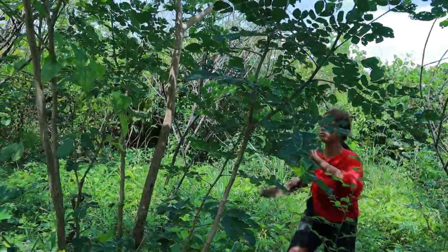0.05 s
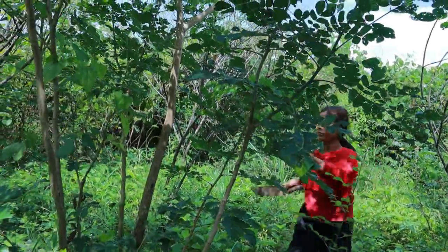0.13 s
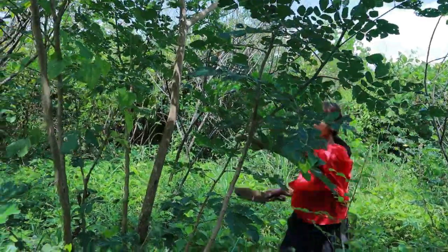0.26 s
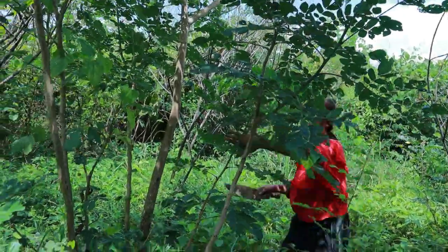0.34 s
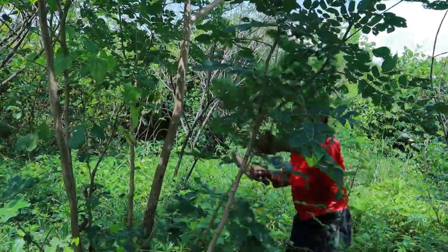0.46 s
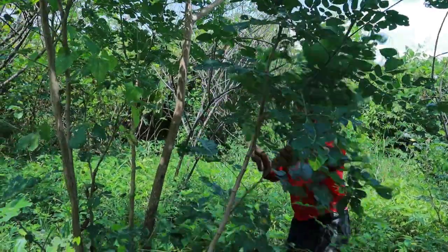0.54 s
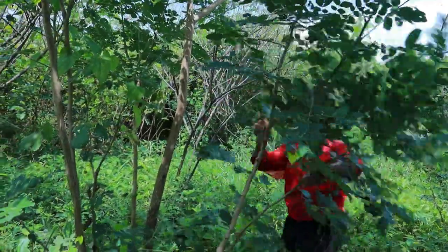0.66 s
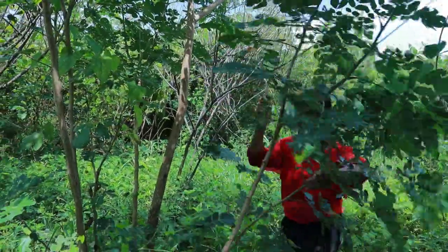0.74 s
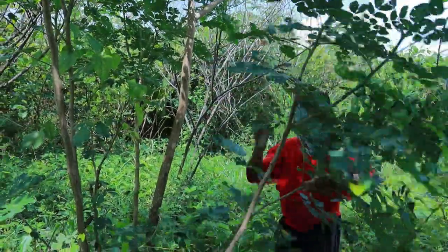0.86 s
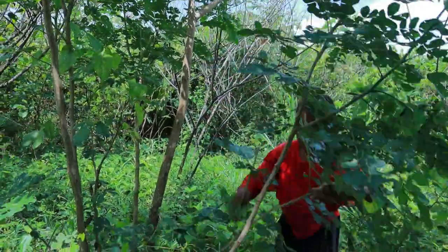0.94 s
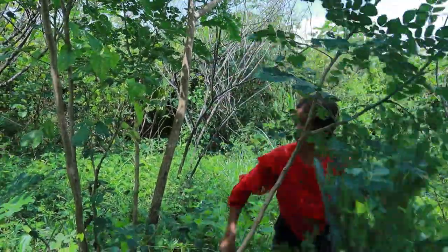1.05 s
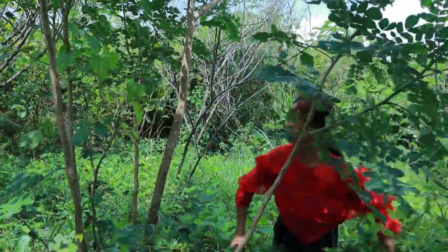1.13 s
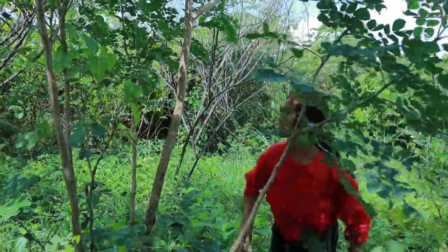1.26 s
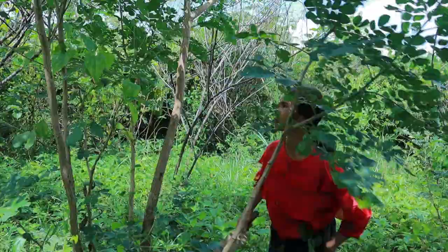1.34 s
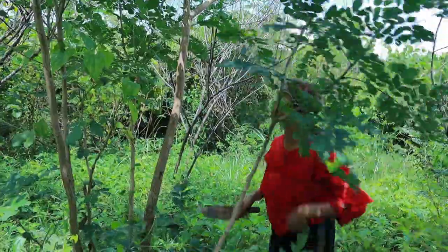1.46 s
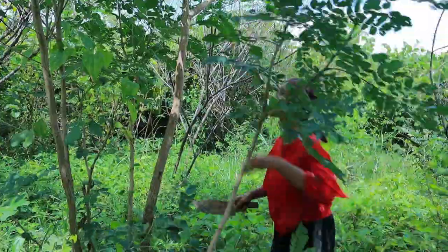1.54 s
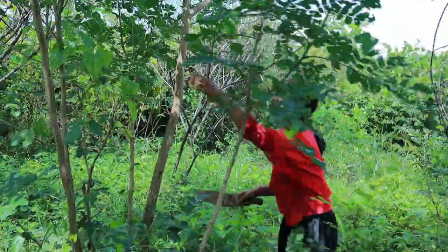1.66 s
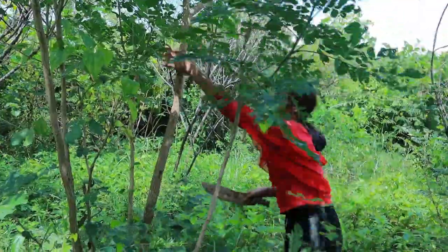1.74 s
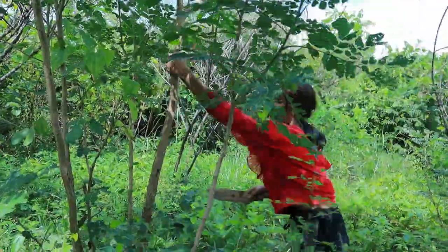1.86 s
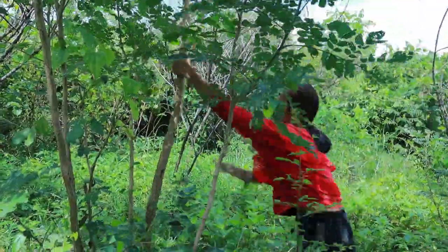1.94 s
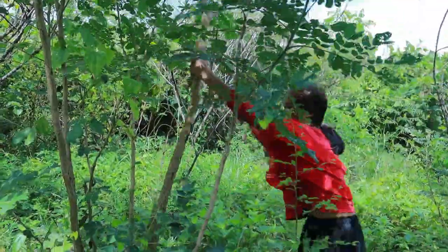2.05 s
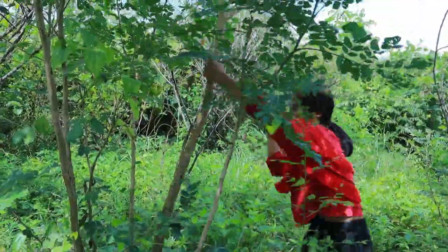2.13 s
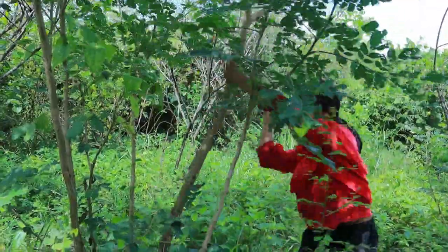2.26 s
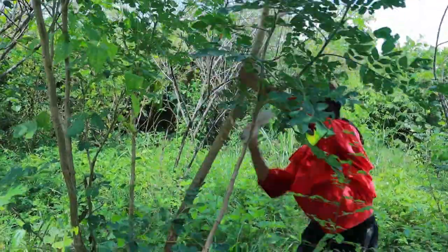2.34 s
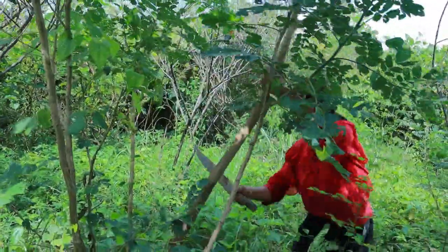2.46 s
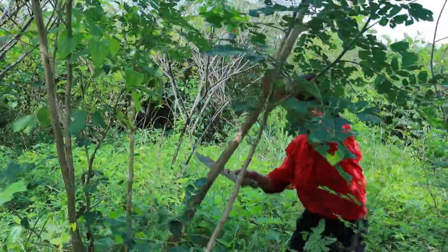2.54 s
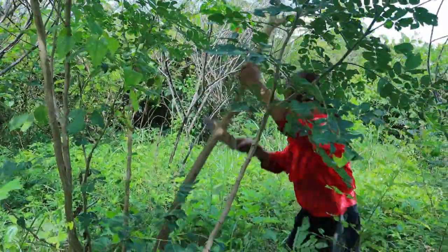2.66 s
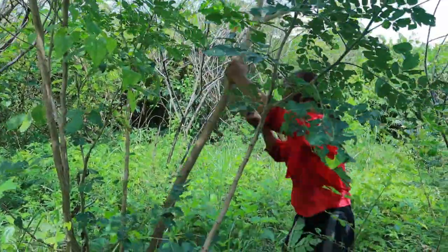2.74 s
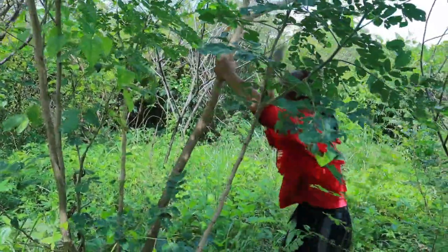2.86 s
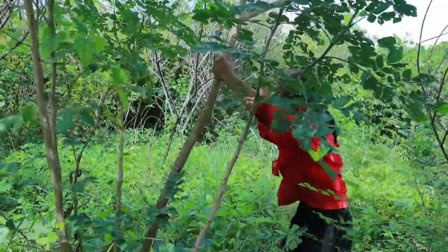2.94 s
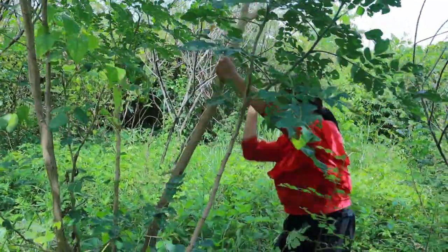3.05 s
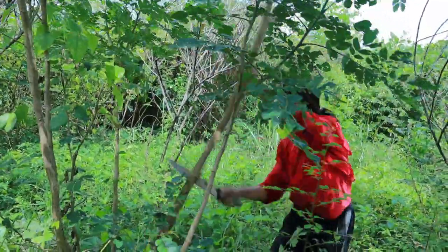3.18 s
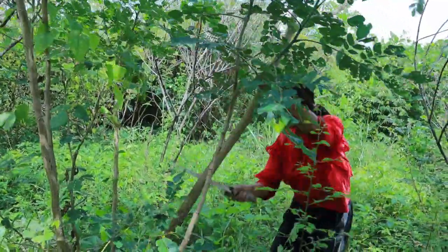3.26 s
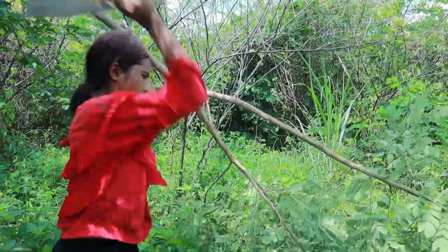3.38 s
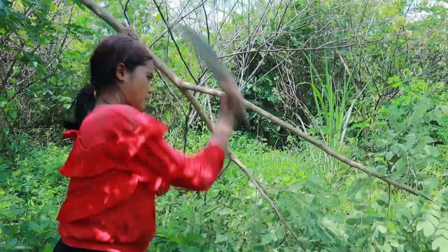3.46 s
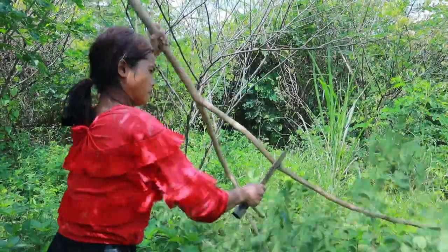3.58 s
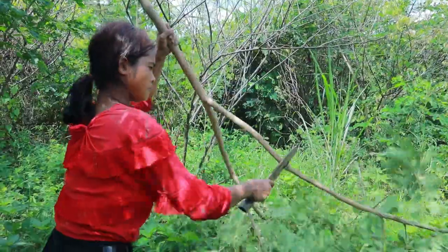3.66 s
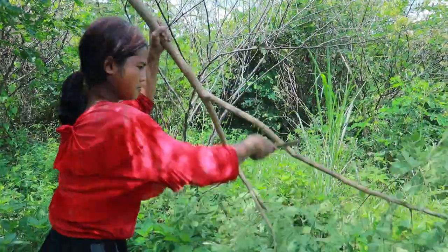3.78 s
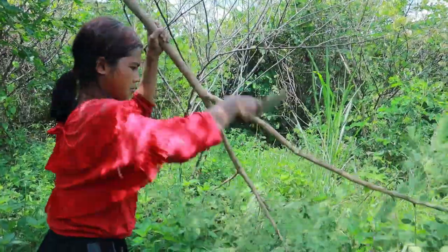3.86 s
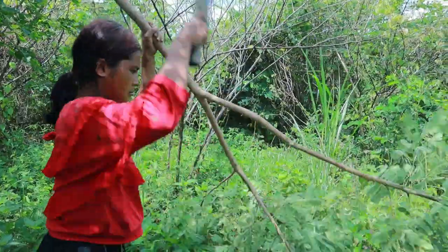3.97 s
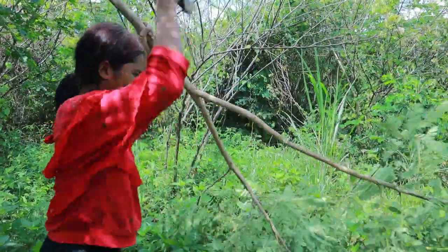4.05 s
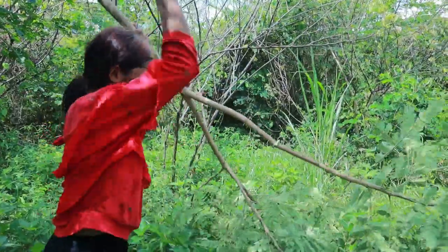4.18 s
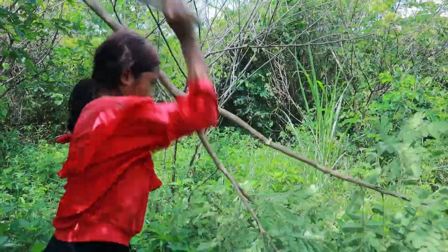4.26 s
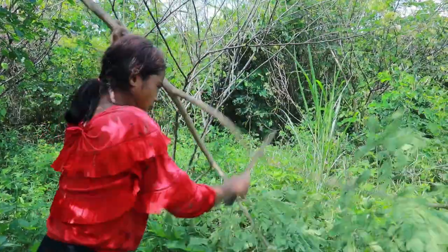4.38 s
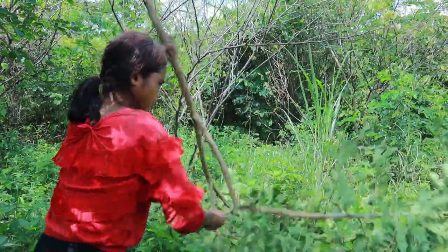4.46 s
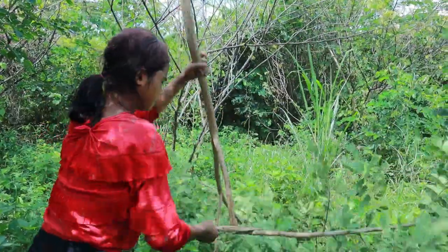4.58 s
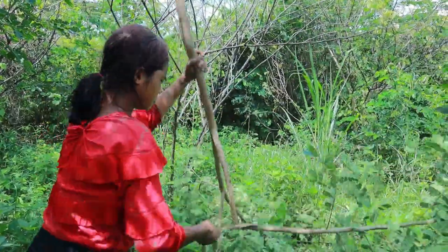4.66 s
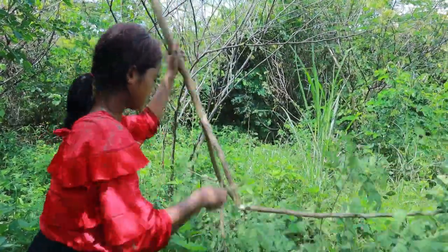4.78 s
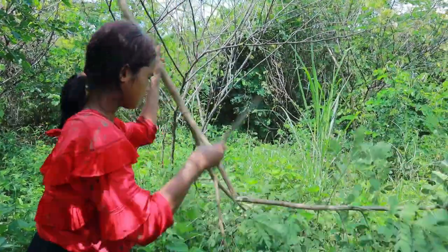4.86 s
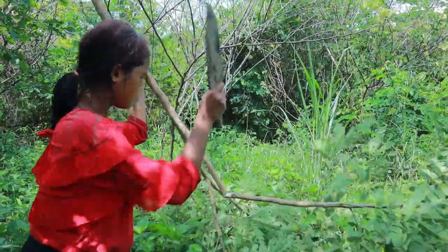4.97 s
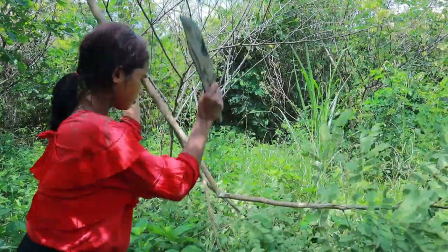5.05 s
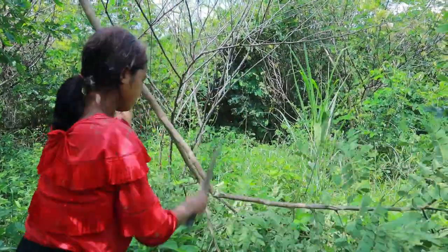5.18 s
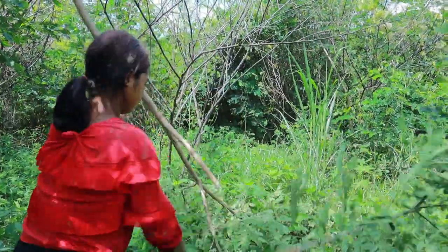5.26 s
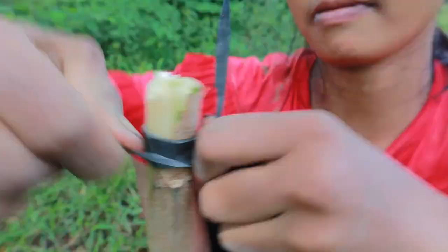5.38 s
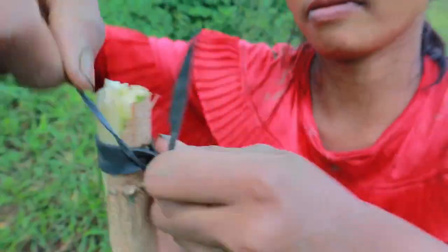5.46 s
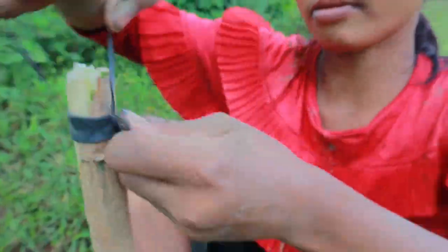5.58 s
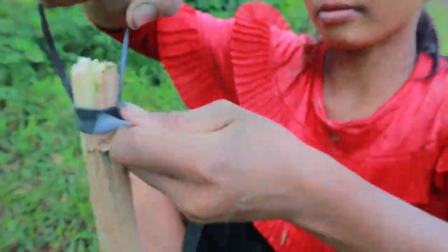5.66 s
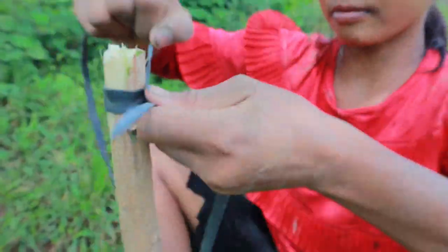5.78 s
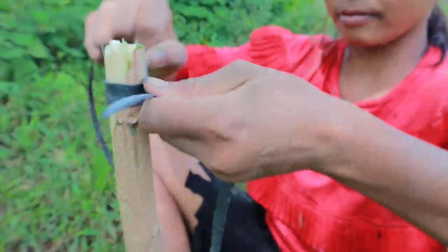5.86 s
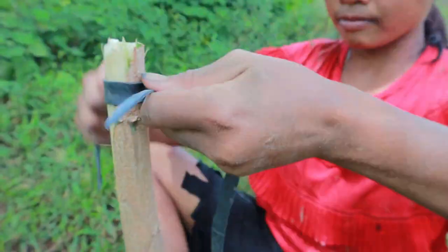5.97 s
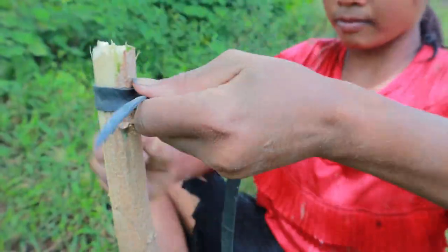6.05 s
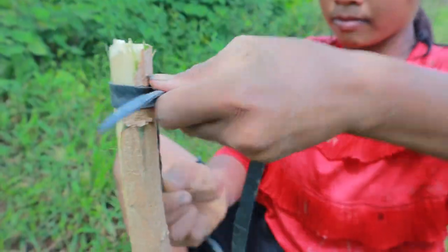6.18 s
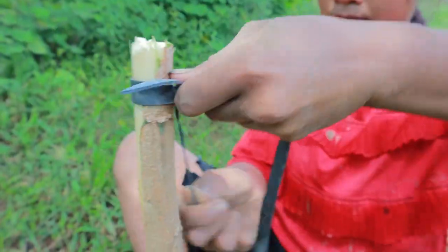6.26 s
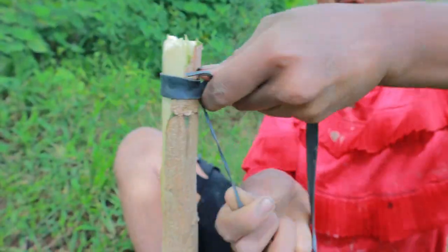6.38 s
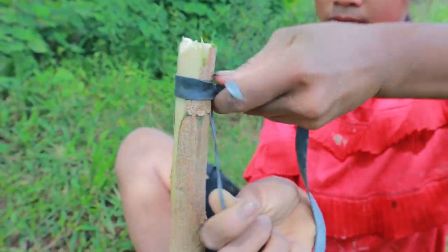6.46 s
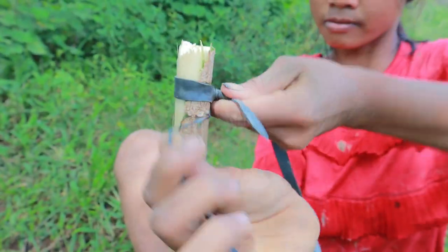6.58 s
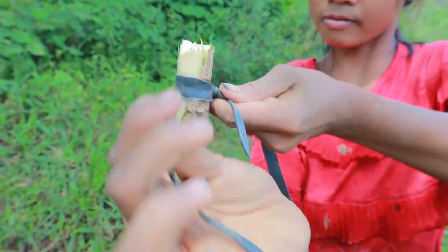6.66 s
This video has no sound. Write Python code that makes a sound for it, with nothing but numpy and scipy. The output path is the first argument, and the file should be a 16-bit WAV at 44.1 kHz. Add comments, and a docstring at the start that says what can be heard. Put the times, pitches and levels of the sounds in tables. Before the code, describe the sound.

A machete chops green saplings in a leafy thicket, sharp cracks and woody thuds at irregular intervals amid bursts of rustling leaves.

```python
"""A leafy thicket where a machete chops green saplings, over a lumpy breeze, a far bird and faint insects.
Blows and ticks are bursts of crushing noise with one sharp crack; blows also ring blade and stem.
Thuds are damped sines with a sagging pitch; foliage is grainy noise in bands that follow every rustle.
The bird is a gliding sine, the insects chirp in narrow noise, a rubber strap squeaks by stick-slip.
Three scenes follow each other with short silences; the wide stereo microphone clips when overloaded."""
import sys
import numpy as np
from scipy import signal
from scipy.io import wavfile
from scipy.ndimage import uniform_filter1d

SR = 44100
rng = np.random.default_rng(int(sys.argv[2]) if len(sys.argv) > 2 else 0)


def pcm_store(signal):
    """Save signal as 16-bit PCM."""
    levels = np.round(np.clip(np.atleast_2d(signal), -1, 1) * 32767)
    wavfile.write(sys.argv[1], SR, levels.astype(np.int16).T)


N = 295955   # length in samples

# blows and snaps: (time [s], peak level [dB], tilt at 700 Hz [dB], at 3 kHz [dB], at 8 kHz [dB],
# crunch length [ms], t60 at 3 kHz [s], pan [dB], ring level [dB], best rung frequency [Hz])
BLOWS = [(1.043, -21.5, 4.5, 1.5, -8.5, 2.4, 0.075, -5, -2, 1160),
         (1.086, -9, -24, -6, -7.5, 1.3, .027, 0, -6, 4100),
         (1.0952, -3, -17.5, -9, -5.5, .3, .004, -1.5, -20, 4000),
         (1.1003, -11.5, -5.5, -3.5, -9, 4.8, 0.064, -5, -2, 3970),
         (1.1111, -7.5, -20, -13, -22, 3.0, .039, -6, -4, 4030),
         (1.1177, -11.5, -3, -19, -13, 3.0, 0.077, -2, -8, 3950),
         (1.2934, -9.5, -12, -14, -3.5, 1.3, 0.046, 2, -24, 5780),
         (2.2352, -15, -18, -14, -3.5, 1.4, .02, 7, -25, 7000),
         (2.525, 1, -11, -4.5, -9.5, 2.7, 0.022, 1.5, -8, 2700),
         (2.553, -22, 14.5, -27, -21, 2.8, 0.03, 1.1, -1, 657),
         (2.5849, -9, 5.5, -12, -34, 2.4, 0.026, 1, -0.5, 1670),
         (3.297, 0.3, -4, -3.5, -11.5, 4, .022, 2.5, -11.5, 606),
         (3.3318, -18.5, 6.5, -16, -18.5, 1.5, 0.026, -1, 0, 767),
         (3.6169, 0.2, -3.5, -6, -8, 2.8, 0.023, -3, -4.5, 1220),
         (4.4866, -2.5, -9, -3, -1.5, 2.7, 0.013, -1.5, -14, 634),
         (4.496, -4, -20.5, -1.5, -7, .62, 0.039, .6, -8, 5440),
         (5.3214, -4.5, -4, -5, -10, 0.73, 0.051, 1.5, -1, 2840)]
# stereo width of the microphone, side minus mid: (frequency [Hz], level [dB])
WIDTH = [(60, -22), (130, -15), (290, -6), (640, -4.5), (1410, 0.5), (3100, 2), (6820, 6), (15000, 10)]


def amp(db):
    """Decibels to gain."""
    return 10 ** (np.asarray(db) / 20)


def rms_one(x):
    """Scale to unit rms."""
    return x / np.sqrt(np.mean(x ** 2) + 1e-20)


def at_hz(points, hz):
    """Read a spectrum of (frequency, level) points on a log-frequency axis."""
    points = np.array(points)
    return np.interp(np.log(hz), np.log(points[:, 0] + 1), points[:, 1])


def drift(rate_hz):
    """Slow random wandering of spread 1: low-passed noise made at a fortieth of the sample rate."""
    step = 40
    pole = np.exp(-2 * np.pi * step * rate_hz / SR)
    noise = rng.standard_normal(N // step + 2002)
    slow = signal.lfilter([1], [1, -2 * pole, pole * pole], noise)[2000:]
    return np.interp(np.arange(N) / step, np.arange(len(slow)), rms_one(slow))


def ring(x, hz, t60):
    """Two-pole resonator: a unit click sets a sine of height 1 ringing, down 60 dB after t60 seconds."""
    radius, turn = amp(-60 / (t60 * SR)), 2 * np.pi * hz / SR
    return signal.lfilter([0, np.sin(turn)], [1, -2 * radius * np.cos(turn), radius * radius], x + 1e-18)


def grains(per_s, spread_db):
    """Mid and side of many tiny contacts of uneven size; rms 1."""
    hits = rng.random(N) < per_s / SR
    sizes = amp(spread_db * np.minimum(rng.exponential(1, N), 5)) * hits
    return rms_one(sizes * rng.standard_normal((2, N)))


def bank(sources, gain_of_band, narrowing=((1, 0),)):
    """Half-octave bands, each driven through its own envelope; the side gets the microphone's width."""
    edges_hz = 28 * 2 ** np.arange(0, 9.6, .5)
    mid_side = np.zeros((2, N))
    for k, (low, high) in enumerate(zip(edges_hz, edges_hz[1:])):
        hz = np.sqrt(low * high)
        sos = signal.butter(2, [low, high], "band", fs=SR, output="sos")
        drive = sources[k % 2] * gain_of_band(hz) + 1e-18   # neighbouring bands use different noise
        side_db = at_hz(WIDTH, hz) + at_hz(narrowing, hz)
        mid_side += signal.sosfilt(sos, drive) * amp([[0], [side_db]])
    return mid_side


def left_right(mid_side):
    """Mid and side to left and right."""
    return mid_side[0] + mid_side[1] * [[1], [-1]]


def rustle_levels(s):
    """Levels of the four registers: the scene's rest plus every rustle of that scene, added as power."""
    # the thicket at rest, one row a scene:
    # (from [s], breeze [dB], undergrowth [dB], leaf swish [dB], leaf hiss [dB])
    rest = np.array([(0, -48, -48.5, -52.5, -66), (3.37, -48.5, -50, -53.5, -59),
                     (5.45, -48, -45.5, -54, -59)])
    # leaves are shaken, dragged or rubbed by the strap:
    # (time of peak [s], swish level [dB], hiss level [dB], rise [s], t60 [s])
    rustles = [(.1, -46, -44, 0.053, 2.8), (.3, -46, -47, 0.2, 0.52), (.49, -56, -50, .06, .3),
               (.615, -43.5, -42.5, 0.09, 0.21), (.79, -40.5, -42.5, 0.42, 2.2),
               (1.06, -35, -36, 0.013, 0.72), (1.106, -28, -25.5, 0.039, 0.27),
               (1.18, -34.5, -40.5, .08, 1.36), (1.3, -48, -36.5, 0.022, 0.24),
               (1.41, -37, -40.5, 0.16, 0.3), (1.536, -45.5, -46.5, 0.12, 0.39),
               (1.838, -46.5, -46, 0.28, 0.79), (2.12, -50.5, -47, 0.15, 2.9),
               (2.239, -43, -30.5, 0.017, 0.095), (2.28, -41.5, -40, 0.1, 3.5),
               (2.55, -38, -37.5, 0.037, 1.4), (2.852, -45.5, -38, 0.051, 0.36),
               (2.95, -49.5, -47.5, .2, 6.4), (3.27, -45, -49, 0.067, 0.23),
               (3.31, -40.5, -38.5, .012, .45), (3.45, -58, -49.5, 0.069, 0.057),
               (3.65, -33.5, -34.5, 0.021, 1), (3.9, -49, -51, 0.15, 3.3), (4.165, -52, -38, .06, 0.06),
               (4.51, -49, -32, 0.019, 0.19), (4.58, -34.5, -36.5, 0.057, 0.98),
               (4.95, -49.5, -52, 0.51, 2.6), (5.128, -48, -42.5, 0.028, 0.051),
               (5.335, -34.5, -36.5, 0.017, 0.44), (5.4, -42, -38.5, .05, 0.37), (5.61, -48, -55, .06, .12),
               (6.136, -47, -63, 0.14, 0.27)]
    rise_db = 17.5   # climb over the rise time
    undergrowth_db = -7.5   # twigs below the leaves follow the swish
    starts = rest[:, 0]
    scene_at = np.searchsorted(starts, s, side="right") - 1
    power = amp(rest[scene_at, 1:].T) ** 2
    for peak, swish_db, hiss_db, rise, t60 in rustles:
        climb_db = -rise_db * np.maximum(peak - s, 0) / rise
        fall_db = -60 * np.maximum(s - peak, 0) / t60
        here = scene_at == np.searchsorted(starts, peak) - 1
        tops_db = np.array([[swish_db + undergrowth_db], [swish_db], [hiss_db]])
        power[1:] += here * amp(climb_db + fall_db + tops_db) ** 2
    return 10 * np.log10(power)


def foliage():
    """Leaves rub in dense grains; each register follows its own effort and flickers partly in step."""
    # colour of the thicket: (frequency [Hz], level per Hz [dB])
    colour = [(20, -18), (30, -7.5), (64, -4.5), (119, -7.5), (274, -7.5), (368, -9.5), (666, -9),
              (1110, -11), (3340, -10), (8810, -15), (13000, -13)]
    gust_db, gusts_per_s = 2.0, 8.0   # the breeze is lumpy on the microphone
    s = np.arange(0, N / SR, .002)
    levels = rustle_levels(s)
    # breeze, undergrowth, swish, hiss [Hz]
    registers = [(30, 250), (250, 1200), (1200, 5000), (5000, 13000)]
    centres = np.log([90, 550, 2500, 8000])
    together, gusts = drift(15.2), drift(gusts_per_s)
    grid = np.geomspace(20, 16000, 400)
    power = amp(at_hz(colour, grid)) ** 2 * np.gradient(grid)
    # effort = level over what the resting colour gives in that register
    effort = []
    for db, (low, high) in zip(levels, registers):
        inside = (grid > low) & (grid < high)
        effort.append(db - 10 * np.log10(power[inside].sum()))

    def gain(hz):
        # blend the efforts of the neighbouring registers
        shares = [np.interp(np.log(hz), centres, one) for one in np.eye(len(centres))]
        db = sum(share * row for share, row in zip(shares, effort))
        flicker = 1.64 * together * (hz > 400) + gust_db * gusts * (hz < 250) + 0.57 * drift(6.2)
        level_db = np.interp(np.arange(N) / SR, s, db) + at_hz(colour, hz) + flicker
        return np.sqrt(SR / 2) * amp(level_db)   # level per Hz to noise gain

    def rubbing():
        return rng.standard_normal((2, N)) + 0.42 * grains(1500, 3.35) + 0.22 * grains(300, 3.1)
    return left_right(bank([rubbing(), rubbing()], gain))


def blows():
    """Fibres crush for a few ms, then the scatter dies, treble first; blows also strike the modes."""
    # twig and strap ticks, too light to ring: (time [s], peak level [dB], brightest at [Hz], pan [dB])
    ticks = [(0.0873, -18.5, 3500, 0), (.548, -25, 4000, -7), (.5887, -23, 3500, -14), (.615, -25, 4000, 2),
             (1.0795, -7, 1500, -1), (1.2356, -21, 2200, -4), (1.3914, -17, 2500, -9),
             (2.271, -26, 4500, 26), (2.3125, -24.5, 9000, 11), (2.768, -28, 10000, -17),
             (3.3503, -12, 4000, -3), (3.6357, -12, 2000, -11), (3.6524, -17, 6000, -8),
             (3.708, -21, 9000, -1), (3.796, -25.5, 7000, -10), (4.156, -22, 8000, -8),
             (4.7082, -25, 4000, -11), (4.778, -20, 3500, -5), (4.827, -21, 2000, 0),
             (5.3994, -22, 4000, -18), (5.6425, -19.5, 8000, 1), (5.66, -44, 6500, 0),
             (5.7302, -33, 4000, 0), (6.2065, -21.5, 4400, 3), (6.506, -34, 2000, .6)]
    # modes of blade and stem: (frequency [Hz], level [dB], t60 [s])
    modes = [(436, -18.5, 0.0046), (685, -1, 0.02), (1254, -10.5, 0.052), (1653, -16, 0.084),
             (2073, -12.5, 0.065), (2532, -9.5, 0.025), (2840, -16.5, 0.1), (4107, -8.5, 0.05),
             (5840, -27, 0.04), (7000, -36, 0.018), (7950, -23, 0.072), (8678, -28, 0.11),
             (10420, -19, 0.099)]
    # near sounds are narrower than the thicket: (frequency [Hz], added side level [dB])
    near_width = [(200, -13), (1000, -14.5), (3000, -6), (9000, -5.5)]
    tick_ms, tick_t60_s, tick_db_per_octave = .3, .006, 7
    pan_from_hz = 950   # the microphone tells left from right mainly above this

    marks = np.array([700, 3000, 8000])
    rows = [row[:8] for row in BLOWS]
    for s, db, hz, pan in ticks:
        tilts = -tick_db_per_octave * np.abs(np.log2(marks / hz))
        rows.append((s, db, *tilts, tick_ms, tick_t60_s, pan))
    rows = np.array(rows)
    t = np.arange(SR // 11) / SR
    scatter = amp(-25.5 - 60 * t / 0.23)   # scatter off the bushes
    attack = np.minimum(t / 0.00012, 1)
    crush = [.7 * rng.standard_normal((2, N)) + .7 * grains(6000, 2.5) for _ in range(2)]
    # one sharp crack opens each contact, most of a short one
    signs = rng.choice([-1, 1], (len(rows), 2)).T
    crack = 3.6 * signs * [[1], [.6]] / np.sqrt(rows[:, 5])
    for source in crush:
        source[:, (rows[:, 0] * SR).astype(int) + 12] = crack

    def gain(hz):
        env = np.zeros(N + len(t))
        for s, db, low_db, mid_db, high_db, ms, t60, _ in rows:
            tilt = at_hz([(50, low_db - 27.0), (150, low_db - 14.5), (700, low_db), (3000, mid_db),
                          (8000, high_db), (13000, high_db - 1.5)], hz)
            late = np.maximum(t - ms / 1000, 0)
            fall = amp(-60 * late / (t60 * (hz / 3000) ** -.2)) + scatter
            env[round(s * SR):][:len(t)] += amp(db + tilt) * fall * attack
        return env[:N]
    mid_side = bank(crush, gain, near_width)

    s, db, ring_db, best_hz = np.array(BLOWS)[:, [0, 1, 8, 9]].T
    chance = rng.normal(0, 2.5, (len(s), len(modes)))   # dB
    for (hz, mode_db, t60), luck in zip(modes, chance.T):
        clicks = np.zeros(N)
        # the strike place favours nearby modes
        place_db = -7.0 * np.minimum(np.abs(np.log2(hz / best_hz)), 2.2)
        clicks[(s * SR).astype(int) + 20] = amp(db + ring_db + mode_db + place_db + luck)
        side = amp(at_hz(WIDTH, hz) + at_hz(near_width, hz) - 3) * rng.choice([-1, 1])
        mid_side += ring(clicks, hz, t60) * [[1], [side]]

    # the pan jumps to each contact 2 ms ahead of it
    rows = rows[np.argsort(rows[:, 0])]
    latest = np.searchsorted(rows[:, 0], np.arange(N) / SR + .002) - 1
    pan = rows[np.maximum(latest, 0), 7]
    stereo = left_right(mid_side)
    low = signal.lfilter(*signal.butter(1, pan_from_hz, fs=SR), stereo)
    return low + (stereo - low) * amp([pan / 2, -pan / 2])


def thuds():
    """Damped swings that build up over their rise time while their pitch sags."""
    # stem thuds, hollow knocks and puffs of air:
    # (time [s], level [dB], settled frequency [Hz], rise [ms], t60 [s])
    swings = [(.27, -32.5, 55, 11, .077), (1.045, -23.5, 1142, 3.6, 0.08), (1.071, -23, 229, 12, .089),
              (1.1, -27.5, 146, 7.7, 0.087), (2.497, -25, 265, 7.3, .5), (2.527, -13.5, 90, 1.2, 0.065),
              (2.528, -16, 463, 1.3, 0.054), (2.5288, -12.5, 222, 1.1, 0.046),
              (2.534, -20.5, 64.6, 3.7, 0.17), (2.5522, -15.5, 298, 1.8, 0.015),
              (2.586, -23.5, 335, 4.9, .028), (3.2974, -16.5, 95, 3.6, .092), (3.3, -9.5, 197, 0.89, 0.01),
              (3.62, -20.5, 172, 1.9, 0.06), (3.642, -29, 262, 8, .057), (4.261, -30, 263, 12.5, .031),
              (4.488, -17.5, 200, 1.4, 0.038), (4.488, -21.5, 620, 5.4, 0.027),
              (5.322, -14, 843, 1.6, 0.013), (5.324, -33, 140, 2.1, 0.05), (5.876, -34.5, 84.5, 6.8, .06),
              (6.2065, -28, 2400, 0.51, .015), (6.21, -33, 70, 13, 0.1)]
    sag_hz, sag_s = 45, 0.009   # the pitch starts at most this much higher and settles
    out, t = np.zeros(N + SR), np.arange(SR // 4) / SR
    for s, db, hz, rise_ms, t60 in swings:
        rise = rise_ms / 1000
        env = np.minimum(t / rise, 1) * amp(db - 60 * np.maximum(t - rise, 0) / t60)
        if t60 > .3:   # a swung stem whistles until the next blow stops it
            next_blow = min(row[0] for row in BLOWS if row[0] > s)
            env *= t + s < next_blow
        sag_cycles = min(sag_hz, hz / 4) * sag_s * (1 - np.exp(-t / sag_s))
        out[round(s * SR):][:len(t)] += env * np.sin(2 * np.pi * (hz * t + sag_cycles))
    return out[:N]


def bird():
    """One gliding near-sine, repeated: each note falls in pitch under a half-sine swell."""
    # a far bird's falling notes, in pairs: (time [s], level [dB])
    notes = [(2.015, -53), (2.09, -50), (2.362, -52), (2.432, -46), (3.412, -56), (3.468, -50), (4.36, -51),
             (4.434, -53)]
    note_s, from_hz, to_hz, roughness = .038, 3550, 3020, .35
    out, t = np.zeros(N), np.arange(int(note_s * SR)) / SR
    waver = drift(60)   # leaves in the path make it waver
    glide = from_hz * t + (to_hz - from_hz) * t ** 2 / (2 * note_s)
    note = np.sin(np.pi * t / note_s) * np.sin(2 * np.pi * glide)
    for s, db in notes:
        start = round(s * SR)
        rough = 1 + roughness * waver[start:][:len(t)]
        out[start:][:len(t)] += amp(db) * rough * note
    return out * amp([[1.5], [-1.5]])   # slightly left


def insects():
    """A narrow noise band chirps at a steady pace, wide in the stereo field."""
    from_s, every_s, chirp_s = 5.535, .172, .105
    hz, level_db, wander_db = 8350, -68.5, 1.5
    t = np.arange(N) / SR - from_s
    chirp = uniform_filter1d(1. * (t > 0) * (t % every_s < chirp_s), size=400)
    song = rms_one(ring(rng.standard_normal((2, N)), hz, .025))
    level = amp(level_db + wander_db * drift(3))
    return left_right(level * chirp * song * amp([[0], [3]]))


def strap():
    """Stick-slip noise in a narrow resonance while the rubber slides."""
    # the rubber strap squeaks on the wood: (time [s], length [s], frequency [Hz], level [dB])
    squeaks = [(5.58, .045, 1920, -46.5), (5.578, .04, 3200, -53), (5.633, .011, 3200, -44),
               (6.114, 0.028, 2040, -49), (6.15, 0.025, 3200, -54), (6.225, 0.013, 3300, -55)]
    squeak_t60_s = 0.0096
    out = np.zeros(N)
    for s, length, hz, db in squeaks:
        t = np.arange(int(length * SR)) / SR
        slips = rng.standard_normal(len(t))
        swell = np.sin(np.pi * t / length) ** .5
        out[round(s * SR):][:len(t)] += amp(db) * swell * rms_one(ring(slips, hz, squeak_t60_s))
    return out


def scene():
    """Everything at the microphone."""
    return foliage() + blows() + thuds() + bird() + insects() + strap()


def record(dry):
    """Microphone roll-off and resonance, overload, silences between the scenes, cut top."""
    # silences: (from [s], to [s], fade [ms])
    silences = [(3.355, 3.388, 4.0), (5.436, 5.465, 5.0)]
    silence_db, mic_top_hz, cutoff_hz = -28, 11200, 15600
    peak_hz, peak_q, peak_share = 10160, 11, 0.3   # resonance of the capsule
    t, gate = np.arange(N) / SR, np.ones(N)
    for start, end, fade_ms in silences:
        outside = np.maximum(start - t, t - end)
        gate *= np.clip(outside / (fade_ms / 1000), amp(silence_db), 1)
    mic = signal.sosfilt(signal.butter(6, mic_top_hz, fs=SR, output="sos"), dry)
    mic = mic + peak_share * signal.lfilter(*signal.iirpeak(peak_hz, peak_q, SR), mic)
    mic = signal.sosfilt(signal.butter(2, 40, "high", fs=SR, output="sos"), mic)
    overloaded = np.clip(mic, -.98, .98)
    top_cut = signal.ellip(10, .5, 70, cutoff_hz, fs=SR, output="sos")
    return signal.sosfilt(top_cut, gate * overloaded)


dry = scene()
out = record(dry)
pcm_store(out)
```